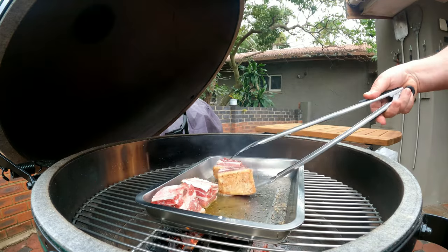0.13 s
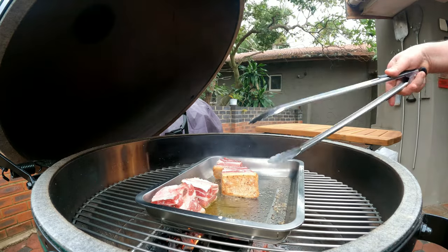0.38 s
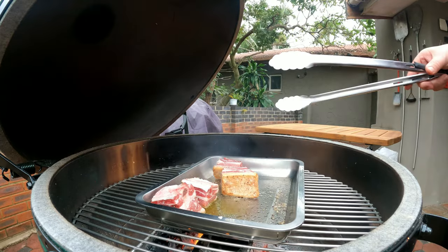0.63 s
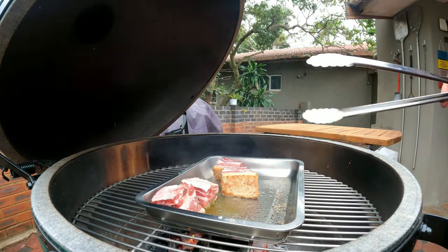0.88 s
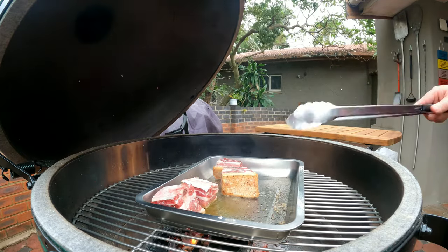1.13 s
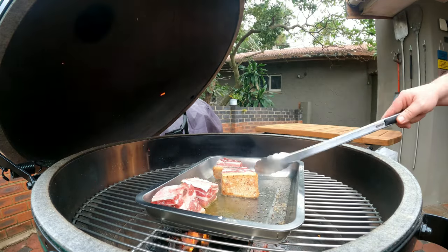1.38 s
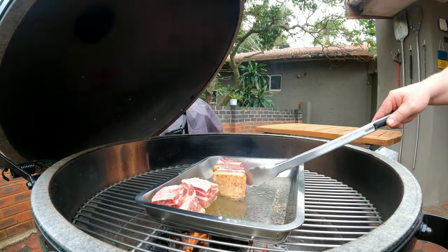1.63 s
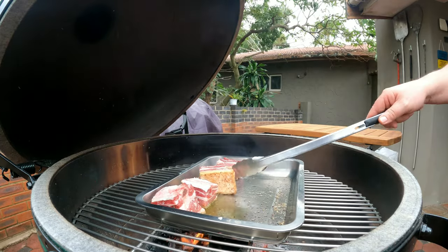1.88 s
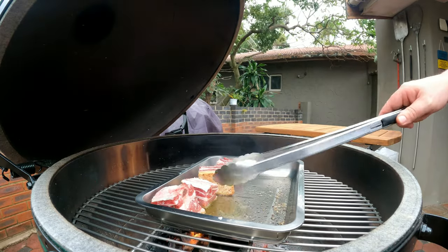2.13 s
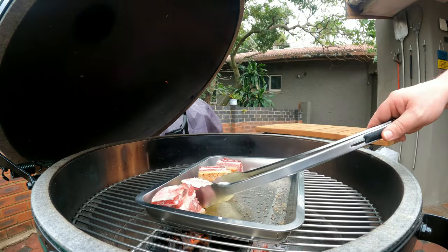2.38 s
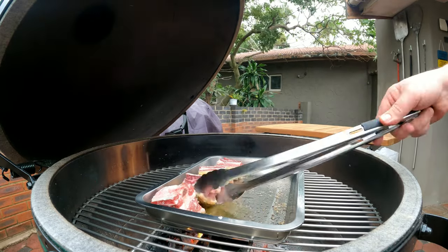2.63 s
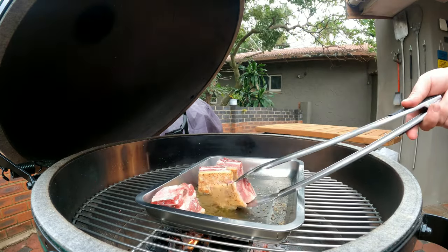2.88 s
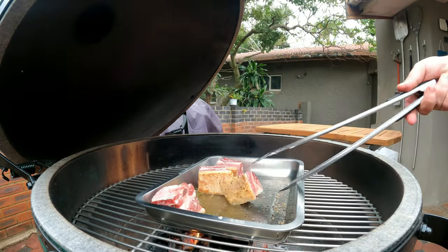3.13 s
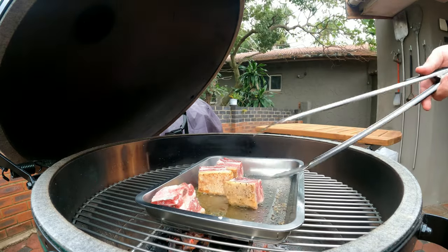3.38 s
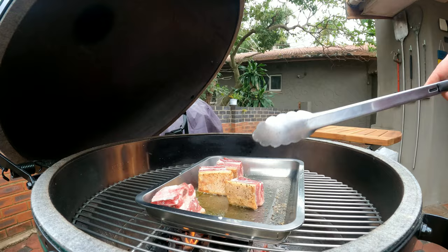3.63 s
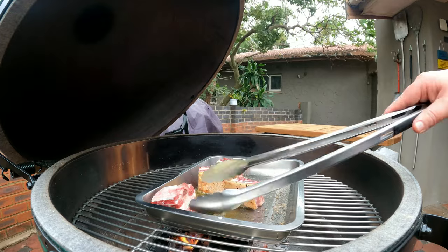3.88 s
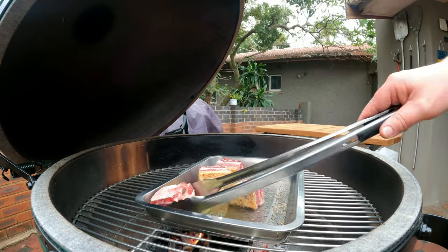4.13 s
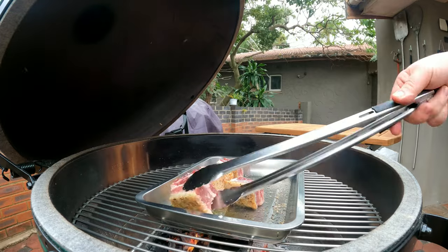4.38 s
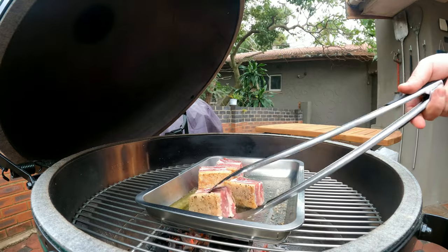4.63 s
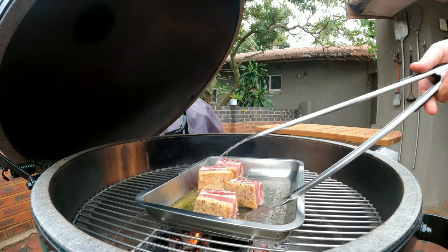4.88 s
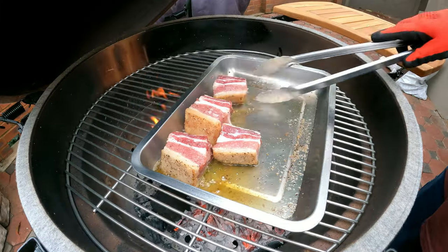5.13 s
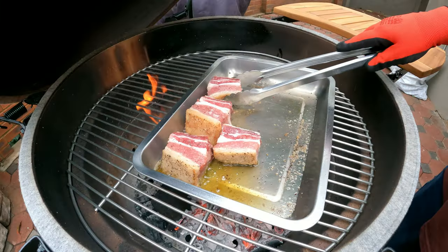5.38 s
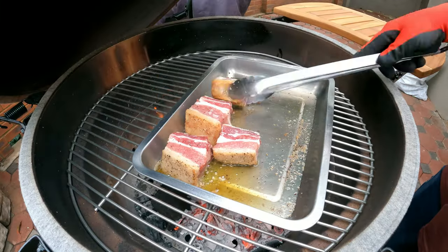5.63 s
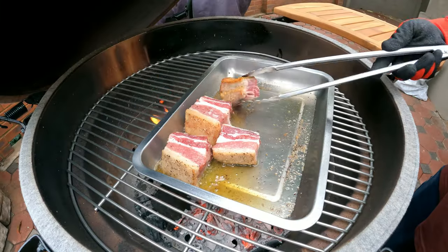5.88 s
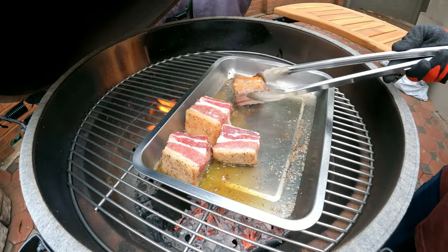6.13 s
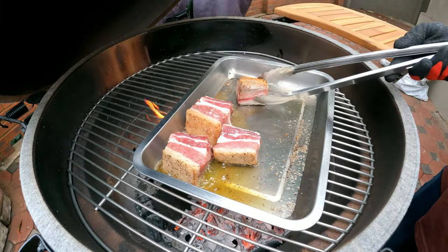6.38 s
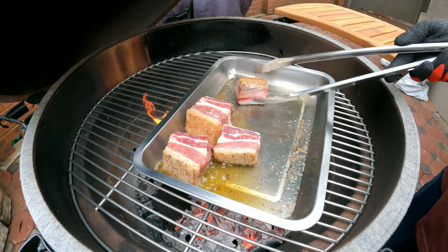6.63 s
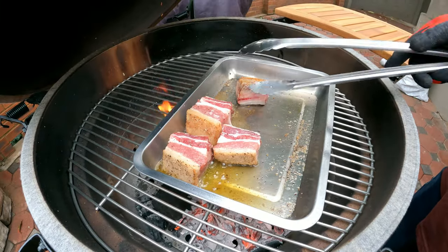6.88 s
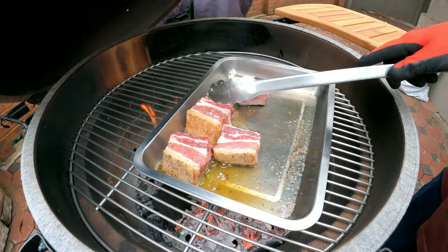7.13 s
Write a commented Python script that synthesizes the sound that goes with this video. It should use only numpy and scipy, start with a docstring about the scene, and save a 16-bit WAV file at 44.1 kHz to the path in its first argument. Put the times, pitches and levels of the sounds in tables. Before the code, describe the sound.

Steady bubbling sizzle and loud irregular fat pops from a steel tray, cut by a short silence before closer, hissier frying with wind buffeting.

```python
"""Meat sears in hot oil in a steel tray: bubbles burst as dense fizz and loud pops, each a short rising tone.
Pops add torn-film noise and tray thuds; droplets spit and tick, sputters swell, filtered noise hisses.
The charcoal kettle around it, domed lid open outdoors, echoes bubbles and droplets; coals snap drily.
Wind rumbles and thumps at the microphone; resonant noise makes whooshes and, last, likely a touch of tongs.
The microphone is beside the kettle; after an abrupt cut and short silence, above the tray, more buffeted."""
import sys
import numpy as np
from scipy import signal
from scipy.fft import rfft, irfft, next_fast_len
from scipy.io import wavfile
from scipy.ndimage import uniform_filter1d

SR = 44100
rng = np.random.default_rng(int(sys.argv[2]) if len(sys.argv) > 2 else 0)


def how_loud(loudness_db):
    """Turn decibels into a plain amplitude multiplier (0 dB gives 1, 20 dB gives 10)."""
    steps = np.asarray(loudness_db, float) / 20
    return 10 ** steps


def generate_wav(signal):
    """Clip the signal to [-1, 1] and save it as 16-bit WAV at the path in sys.argv[1]."""
    frames = np.transpose(np.atleast_2d(signal))
    scaled = np.clip(frames, -1, 1) * 32767
    pcm = np.round(scaled).astype(np.int16)
    wavfile.write(sys.argv[1], SR, pcm)


N = 320166

# channel-difference noise: [f/Hz, level re octave/dB]
GRAIN_SPECTRUM = [(60, -16), (150, -44), (380, -17), (950, -26), (2380, -32.5), (5980, -21.5),
                  (15000, -8.5)]
# wind colour: [f/Hz, relative density/dB per Hz]
WIND_SPECTRUM = [(12, -50), (20, -20), (59, 1), (108, 4.5), (197, -2.5), (362, -23.5), (500, -27.5),
                 (650, -59), (1100, -120)]
# gusts: [t/s, length/s, level before band filter/dB]
GUSTS = [(.3, 0.34, -56), (.87, 0.34, -52), (1.65, 0.54, -56.5), (3.2, 0.28, -62), (4.14, 0.047, -52),
         (5.52, 0.062, -39), (5.68, 0.07, -32.5), (5.82, 0.066, -37), (6.02, 0.17, -35),
         (6.38, 0.13, -34.5), (6.57, 0.016, -44.5), (6.64, 0.064, -45.5), (6.78, 0.017, -47.5),
         (6.91, 0.046, -45.5), (7.06, 0.026, -43), (7.24, 0.022, -41)]
# low wind thumps: [nominal t/s, level before band filter/dB, starting f/Hz]
THUMPS = [(5.564, -33, 143), (5.664, -24, 127), (5.699, -21, 82.5), (5.739, -20.5, 125), (5.798, -25, 106),
          (6.023, -20.5, 94), (6.067, -14.5, 184), (6.125, -15.5, 155), (6.15, -25, 156),
          (6.303, -28.5, 111), (6.376, -22, 106), (6.411, -27, 133.6), (6.485, -19, 92.5),
          (6.626, -32, 107), (6.928, -33, 76.7), (7.057, -33, 114), (7.143, -26, 190), (7.183, -29.5, 105)]
# hollow noises: wind whooshes, and at 7.22 s likely a touch of the tongs: [t/s, length/s, level/dB, f/Hz]
HOLLOW_NOISES = [(6.116, 0.034, -54, 724), (6.23, 0.28, -52.5, 733), (6.29, 0.11, -55, 561),
                 (7.22, 0.03, -49.5, 595)]
# hiss and air beside the kettle: [f/Hz, relative density/dB per Hz]
HISS_BESIDE = [(29, -40.5), (50, -28), (129, 2.5), (185, -4), (280, -3), (539, -4), (1390, -7.5),
               (2050, -4), (2490, -9), (4140, -10.5), (5400, -16.5), (7060, -14), (15000, -28),
               (16500, -44.5)]
# hiss and air above the tray: [f/Hz, relative density/dB per Hz]
HISS_ABOVE = [(180, -27), (300, 1.5), (373, -6), (558, 0), (1250, -5), (1960, 1), (3970, 2.5),
              (8580, -11.5), (14700, -21.5), (15700, -22), (16500, -50)]
# lid echoes: [nominal delay/s, level before bowl filter/dB]
LID_ECHOES = [(.0042, -7), (.008, -17), (0.0105, -18)]
# charcoal snaps: [t/s, level before band filter/dB]
SNAPS = [(1.5731, -9.5), (2.1359, -6.5), (5.7453, -8)]
# tray knocks: [t/s, level before band filter/dB, starting f/Hz]
KNOCKS = [(1.364, -34, 805), (1.94, -19.5, 1000), (2.029, -32, 765), (2.22, -34, 607), (3.676, -29.5, 770),
          (3.79, -33, 805), (4.623, -30, 750), (3.034, -32, 170), (3.034, -17.5, 806), (3.356, -26.5, 704),
          (3.388, -32, 506), (5.25, -28.5, 630)]
# spitting droplets: [t/s, level before band filter/dB]
SPITS = [(.043, -33.5), (0.332, -40), (.463, -45), (.568, -41), (.637, -36), (1.352, -37), (1.711, -33),
         (1.738, -38), (1.955, -34.5), (2.128, -39), (2.2206, -17), (2.245, -35), (2.434, -35),
         (2.894, -38), (3.102, -33), (3.123, -32), (3.75, -31), (3.894, -35), (4.305, -37), (4.727, -36),
         (5.229, -34), (5.718, -35), (6.926, -34)]
# passband of those droplets: [low f/Hz, high f/Hz]
SPIT_BAND_HZ = [6000, 14000]
# passbands of random droplet ticks: [low f/Hz, high f/Hz]
TICK_BANDS_HZ = [(2000, 7000), (5000, 11000), (7000, 13500)]
# loud pops: [t/s, nominal level/dB, starting bubble f/Hz, nominal spit level re pop/dB]
POPS = [(0.068, -17, 1800, -33), (.094, -22, 4030, -35), (.104, -21, 4100, -30), (.121, -25, 4050, -21),
        (0.196, -16, 4100, -16.5), (0.257, -25, 4000, -28), (0.477, -15.5, 1970, -18),
        (.507, -18, 4100, -25), (0.547, -18.5, 1950, -20), (0.592, -16, 2270, -16),
        (0.6556, -14, 1800, -25), (0.6837, -22, 2500, -1.5), (0.777, -20, 1710, -22),
        (0.817, -21.5, 2450, -7), (0.832, -12.5, 1800, -41), (.849, -18, 3650, -24),
        (0.944, -18, 3550, -20.5), (.96, -18, 1900, -23), (.986, -19, 1930, -18), (1.103, -18, 4540, -22),
        (1.115, -14, 2210, -24), (1.13, -9, 2040, -24), (1.158, -18, 2480, -30), (1.3042, -14.5, 4150, -22),
        (1.314, -19, 2100, -16), (1.3645, -13, 2600, -12), (1.476, -20.5, 2690, -6),
        (1.631, -19.5, 2480, -36), (1.7622, -15.5, 2400, -27), (1.8686, -27, 2470, -2.5),
        (1.883, -17.5, 3720, -24), (1.927, -21, 1880, -14), (1.938, -10, 2740, -6), (1.97, -19, 2620, -26),
        (1.984, -20, 1710, -31), (2.028, -9.5, 3500, -14), (2.0497, -23, 3940, -22),
        (2.061, -20, 3800, -21), (2.207, -12.5, 1930, -47), (2.2197, -4, 3800, -11),
        (2.275, -29.5, 3160, 0), (2.295, -18.5, 4210, -11.5), (2.3252, -14, 1970, -22),
        (2.4952, -14, 3360, -20), (2.5513, -17, 1810, -20), (2.563, -18, 1960, -32),
        (2.689, -12, 1800, -63), (2.741, -13, 2590, -33), (2.817, -18, 2080, -20), (2.858, -27, 2740, -4),
        (3.01, -25, 2200, -36), (3.021, -18, 2300, -33), (3.034, -2.5, 3640, -15), (3.0348, -8, 2400, -12),
        (3.082, -13.5, 2010, -24.5), (3.2783, -24.5, 4420, -3.5), (3.3008, -18, 1850, -37),
        (3.3549, -4.5, 4100, -15), (3.3869, -8.5, 4730, -11), (3.4944, -13.5, 3540, -28),
        (3.585, -18.5, 1900, -24), (3.675, -20, 2350, -8.5), (3.714, -9, 2410, -25),
        (3.7248, -12.5, 2000, -16), (3.741, -12, 4000, -29), (3.758, -16, 4260, -16),
        (3.7906, -7, 2240, -20), (3.817, -18, 4400, -32), (3.858, -17, 3900, -24),
        (3.9407, -15.5, 2200, -23.5), (3.958, -17, 2200, -23), (3.9685, -20, 4440, -9),
        (4.2117, -28, 2280, -5), (4.4474, -11, 1920, -34.5), (4.467, -18, 1990, -43.5),
        (4.6229, -16, 3740, -10.5), (4.637, -16, 1930, -18), (4.71, -21, 4300, -19),
        (4.77, -18.5, 2300, -18), (4.873, -15.5, 2190, -30.5), (4.971, -6, 1800, -28),
        (5.096, -12.5, 3300, -8), (5.184, -8, 3850, -16.5), (5.197, -17, 3800, -24),
        (5.214, -11.5, 2240, -18), (5.2491, -13, 3760, -9), (5.609, -15.5, 3800, -23),
        (5.8852, -9, 3970, -31), (5.898, -12, 3920, -34), (5.9248, -25, 2600, -16.5),
        (6.0385, -15.5, 3830, -22), (6.09, -13.5, 3470, -23), (6.3667, -18.5, 2840, -17),
        (6.391, -18, 2190, -30), (6.6093, -11.5, 2340, -29), (6.6926, -18, 2550, -23),
        (6.7446, -7, 3300, -47), (6.7598, -16, 3400, -35), (6.7626, -13, 3140, -41),
        (6.9533, -10, 3260, -48), (7.1873, -22, 3700, -24), (7.21, -14, 2540, -32)]
# small bubbles by pitch: [f/Hz, relative level beside/dB, relative level above/dB]
FIZZ_LEVELS = [(710, -16.5, -16.5), (1370, -27, -23), (1800, 0, 1), (2480, -7.5, 4.5), (3690, 0.5, 8.5),
               (4100, -13.5, 1), (5240, -10, 3), (8500, -19, -2.5), (13100, -26.5, -17.5)]
# sputters: [t/s, length/s, level over frying/dB, centre f/Hz]
SPUTTERS = [(0, 0.36, 2, 4060), (0.47, 0.19, 3, 1940), (0.937, 0.05, 6.5, 3980), (0.948, 0.041, 5.5, 1850),
            (1.098, 0.025, 7, 2650), (1.932, 0.033, 9, 2600), (2.23, 0.097, 5, 2600),
            (3.003, 0.046, 7, 2180), (3.716, 0.037, 6.5, 2300), (3.7, 0.33, 3, 4400),
            (3.81, 0.074, 3.5, 2200), (4.402, 0.055, 5, 1890), (4.604, 0.059, 2.5, 4060),
            (4.633, 0.7, 3.5, 6240), (5.174, 0.15, 4, 3620), (5.76, 0.031, 10.5, 2260),
            (6.075, 0.031, 9, 5000), (6.918, 0.14, 5, 5000)]
# frying: [t/s, vigour level/dB, brightness/dB]
FRYING = [(0, -44.5, 1), (.8, -43.5, 0.5), (1.3, -43.5, 0.5), (2.3, -44.5, 1), (2.9, -43.5, 0),
          (4.1, -43, -1), (4.6, -42.5, -0.5), (4.9, -42, -1), (5.25, -41.5, 0), (5.6, -41.5, 1.5),
          (5.95, -39.5, 4.5), (6.6, -39.5, 0.5), (7.0, -39.5, 3), (7.26, -37.5, 3.5)]

MOVE_S = 5.4
ECHO_ABOVE_DB = -6.5  # echoes are weaker above the tray


def rms_one(x):
    """Scale to rms 1."""
    return x / np.sqrt(np.mean(x ** 2) + 1e-20)


def in_time(rows):
    """Columns of a curve, sample by sample."""
    t_s, *columns = np.transpose(rows)
    return [np.interp(np.arange(N) / SR, t_s, column) for column in columns]


def at_hz(points, hz, column=1):
    """A spectrum column read on a log-frequency axis."""
    points = np.array(points)
    return np.interp(np.log(hz), np.log(points[:, 0]), points[:, column])


def by_place(beside, above):
    """One value before the microphone moves, another after."""
    return np.where(np.arange(N) < MOVE_S * SR, beside, above)


def filtered(x, hz, kind, order=2):
    """Butterworth filter."""
    return signal.sosfilt(signal.butter(order, hz, kind, fs=SR, output="sos"), x)


def drift(rate_hz):
    """Slow random curve of about unit rms: noise through two equal poles at rate_hz."""
    pole = np.exp(-80 * np.pi * rate_hz / SR)  # runs at SR / 40
    noise = rng.standard_normal(N // 40 + 2002)
    slow = signal.lfilter([1], [1, -2 * pole, pole * pole], noise)[2000:]
    return np.interp(np.arange(N) / 40, np.arange(len(slow)), rms_one(slow))


def coloured(spectrum):
    """Noise of a given spectrum, rms 1."""
    size = next_fast_len(N)
    hz = np.maximum(np.arange(size // 2 + 1) * SR / size, 1)
    shaped = rfft(rng.standard_normal(size)) * how_loud(at_hz(spectrum, hz))
    return rms_one(irfft(shaped, size)[:N])


def swells(rows, rise_db_per_s, fall_db_per_s, floor_db):
    """Level in dB: each row rises, holds and falls; the loudest counts."""
    t = np.arange(N) / SR
    for start_s, length_s, db in rows:
        rise = rise_db_per_s * np.maximum(start_s - t, 0)
        fall = fall_db_per_s * np.maximum(t - start_s - length_s, 0)
        floor_db = np.maximum(floor_db, db - rise - fall)
    return floor_db


def add(out, t_s, wave):
    """Mix a wave in at a time."""
    i = max(round(t_s * SR), 0)
    out[i:i + len(wave)] += wave[:N - i]


def bubble(hz, cycles, rise):
    """A few cycles that swell, die and climb in pitch; envelope peak 1."""
    turns = np.arange(int(4 * cycles * SR / hz)) * hz / SR
    swell = turns / cycles * 2
    return swell * np.exp(1 - swell) * np.sin(2 * np.pi * turns * (1 + rise * turns))


def kettle(wave, echo_db=0, shift=0.055):
    """Lid echoes, randomly shifted per call for place on the tray, and a dense decaying bowl tail."""
    t60_s, bowl_db, bowl_cut_hz = 0.059, -3, 4400
    t = np.arange(int(.09 * SR)) / SR
    tail = rng.standard_normal(len(t)) * how_loud(-60 * t / t60_s) * np.minimum(t / 0.00033, 1)
    response = how_loud(bowl_db) * tail / np.sqrt(np.sum(tail ** 2))
    for (delay_s, db), place in zip(LID_ECHOES, rng.standard_normal(len(LID_ECHOES))):
        response[round(delay_s * SR * (1 + shift * place))] += how_loud(db)
    response = how_loud(echo_db) * filtered(response, bowl_cut_hz, "low", order=1)
    response[0] = 1  # direct sound
    return signal.fftconvolve(np.atleast_2d(wave), response[None], axes=1)


def edit_gain():
    """Abrupt cut with a faint fast-falling trail, silence, short fade-in."""
    out_s, in_s, fade_s, fade_power = 5.284, 5.5, 0.065, 1.7
    trail_db, trail_fall_db_per_s = -37, 1500
    t = np.arange(N) / SR
    trail = how_loud(trail_db - trail_fall_db_per_s * np.maximum(t - out_s, 0))
    fade_in = np.clip((t - in_s) / fade_s, 0, 1) ** fade_power
    return np.where(t < out_s, 1, trail + fade_in)


def grain(mono, patchy_db=5.0):
    """Patchy noise that follows the slow level of each octave of the sound."""
    out, shared = np.zeros(N), drift(26.0)
    for low_hz in 31.25 * 2.0 ** np.arange(9):
        band = [low_hz, 2 * low_hz]
        power_db = 10 * np.log10(filtered(mono, band, "band") ** 2 + 1e-14)
        level = how_loud(uniform_filter1d(power_db, size=3000))
        noise = rms_one(filtered(rng.standard_normal(N), band, "band"))
        patches = rms_one(how_loud(patchy_db * (0.62 * shared + 0.7 * drift(12))))
        out += how_loud(at_hz(GRAIN_SPECTRUM, low_hz * np.sqrt(2))) * level * noise * patches
    return out


def wind(lumpy_db=3.0):
    """Eddies press on the microphone: lumpy rumble, deeper in the kettle's lee, and single low thumps."""
    calm_db = by_place(-63, -52)
    rumble = coloured(WIND_SPECTRUM) * how_loud(lumpy_db * drift(13))
    deep = signal.lfilter([1], [1, -.997], rumble)
    level_db = swells(GUSTS, rise_db_per_s=146, fall_db_per_s=165, floor_db=calm_db)
    out = how_loud(level_db) * by_place(rms_one(deep), rms_one(rumble))
    for t_s, db, hz in THUMPS:
        add(out, t_s + 0.004, -how_loud(db) * bubble(hz, 0.54, 0.0086))
    return filtered(out, [42, 380], "band")


def hollow_noises(half_width=0.07):
    """Noise in one resonance for each hollow noise; half_width is a share of its pitch."""
    out = np.zeros(N)
    for *row, hz in HOLLOW_NOISES:
        level_db = swells([row], rise_db_per_s=400, fall_db_per_s=160, floor_db=-100)
        band = [hz * (1 - half_width), hz * (1 + half_width)]
        out += how_loud(level_db) * rms_one(filtered(rng.standard_normal(N), band, "band"))
    return out


def hiss(hiss_db, flicker_db=(2.5, 1.2)):
    """Countless tiny bursts and the open air blur to noise, levelled by its 1.5-9 kHz band."""
    noise = by_place(coloured(HISS_BESIDE), coloured(HISS_ABOVE))
    treble = filtered(noise, [1500, 9000], "band")
    move = int(MOVE_S * SR)
    noise = noise / by_place(treble[:move].std(), treble[move:].std())
    return noise * how_loud(hiss_db + by_place(*flicker_db) * drift(19.7))


def snaps():
    """A crack in the coal is one short dry pulse that swings back slowly."""
    out = np.zeros(N)
    for t_s, db in SNAPS:
        add(out, t_s, how_loud(db) * np.exp(-np.arange(60) / 1.4))
    return filtered(out, [300, 12000], "band")


def knocks(cycles=0.66):
    """The tray flexes for a cycle or two: dull tones with kettle echoes."""
    out = np.zeros(N)
    for t_s, db, hz in KNOCKS:
        add(out, t_s, how_loud(db) * kettle(bubble(hz, cycles, 0.14))[0])
    return filtered(out, [120, 1100], "band")


def spits(length_s=0.00061):
    """Each droplet is a short burst of treble noise, high and thin."""
    out, t = np.zeros(N), np.arange(200) / SR
    envelope = t / length_s * np.exp(1 - t / length_s)
    for t_s, db in SPITS:
        add(out, t_s, kettle(how_loud(db) * envelope * rng.standard_normal(200))[0])
    return filtered(out, SPIT_BAND_HZ, "band")


def tearing(x):
    """Colour of a tearing oil film: strong low treble, a brief tray ring, a small peak high up."""
    x = filtered(filtered(x, 1550, "high"), 1550, "high")
    out = 0.44 * filtered(x, 16600, "low") + 1.28 * filtered(x, 4880, "low")
    return out + 0.12 * filtered(x, [3000, 5000], "band") + 0.1 * filtered(x, [9500, 13000], "band")


def crackle(fizz_db, spread_db=10.5, length_s=0.00047, rate_per_s=400.0):
    """Droplets spit at random: short ticks, each in one broad band, far more small than large."""
    sizes = how_loud(spread_db * np.minimum(rng.exponential(1, N), 2.2))
    born = rng.random(N) < rate_per_s / SR
    dealt, noise = rng.integers(0, 3, N), rng.standard_normal(N)
    decay = np.exp(-np.arange(200) / SR / length_s)
    ticks = np.zeros(N)
    for k, band in enumerate(TICK_BANDS_HZ):
        envelope = signal.oaconvolve(sizes * born * (dealt == k), decay)[:N]
        ticks += filtered(envelope * noise, band, "band")
    ticks = rms_one(tearing(kettle(ticks)[0, :N]))
    duller = filtered(ticks, 7200, "low")
    return how_loud(fizz_db + by_place(-10.0, -3.0)) * by_place(ticks, duller)


def pops(spit_s=0.0015, spit_gain_db=1.0, bubble_db=-10.0):
    """Each pop is a bubble, a spit of broad noise as the film tears, and a dull thud on the tray."""
    thud_db, thud_follows = -21, 1  # thud grows with the spit by this share
    layers = np.zeros((N, 3))
    t = np.arange(400) / SR
    burst = (t / spit_s * np.exp(1 - t / spit_s)) ** 2
    for t_s, db, hz, spit_db in POPS:
        bursts = rng.standard_normal((2, 400))
        bursts[:, 40] = [11.0, 9.0]  # the film gives way with one sharp crack
        burst_db = np.array([[spit_db + spit_gain_db], [thud_db + thud_follows * spit_db]])
        bursts *= burst * how_loud(db + burst_db)
        cycles = np.interp(spit_db, [-24, -12], [2.2, 1.4])  # a violent burst rings only briefly
        ring = how_loud(db + bubble_db) * bubble(hz, cycles, 0.0067)[:400]
        parts = np.vstack([np.pad(ring, (0, 400 - len(ring))), bursts])
        add(layers, t_s, kettle(parts, ECHO_ABOVE_DB * (t_s > MOVE_S)).T)
    bubbles, film, thuds = layers.T
    return bubbles + tearing(film) + 1.8 * filtered(thuds, [350, 950], "band")


def sputtering(frying, spread=1.3):
    """Water from the meat boils off in a rush of like bubbles: frying swells within a pitch ratio."""
    out = np.zeros(N)
    for t_s, length_s, db, hz in SPUTTERS:
        part = frying[max(round(t_s * SR), 0):round((t_s + length_s) * SR)]
        part = filtered(part, [hz / spread, hz * spread], "band")
        add(out, t_s, (how_loud(db) - 1) * signal.windows.tukey(len(part), .3) * part)
    return out


def fizz(fizz_db, spread_db=5.0, cycles=2.5, clump_db=4.0, echo_db=-6):
    """Small bubbles burst at random, in clumps, at 34 pitches, in six places on the tray."""
    sizes = how_loud(spread_db * np.minimum(rng.exponential(1, N), 2.5)) * rng.choice([-1, 1], N)
    rate_per_s = by_place(1800.0, 2600.0) * how_loud(clump_db * by_place(1, .7) * drift(20))
    born = rng.random(N) < rate_per_s / SR
    dealt = rng.integers(0, 34, N)
    places = np.zeros((6, N))
    for k, hz in enumerate(np.geomspace(700, 9000, 34)):
        gain = how_loud(by_place(at_hz(FIZZ_LEVELS, hz), at_hz(FIZZ_LEVELS, hz, column=2)))
        bursts = sizes * born * (dealt == k) * gain
        places[k % 6] += signal.oaconvolve(bursts, bubble(hz, cycles, 0.032))[:N]
    echoes = sum(kettle(x, echo_db)[0, :N] - x for x in places)
    out = places.sum(axis=0) + how_loud(by_place(0, ECHO_ABOVE_DB)) * echoes
    out += by_place(0.4, 0.31) * filtered(out, [3800, 4350], "band")  # the tray rings a little
    return how_loud(fizz_db) * rms_one(out)


def scene():
    """Sum all sources at one microphone, on both channels."""
    vigour_db, bright_db = in_time(FRYING)
    fizz_db = vigour_db + by_place(0.5, -6.5)
    hiss_db = vigour_db + by_place(-6.5, -6)
    frying = fizz(fizz_db) + crackle(fizz_db) + hiss(hiss_db)
    frying = frying + sputtering(frying)
    frying = frying + (how_loud(bright_db) - 1) * filtered(frying, 5000, "high")
    mono = frying + pops() + knocks() + snaps() + spits() + wind() + hollow_noises()
    return np.stack([mono, mono])


def band_limit(x):
    """A steep low-pass at the top of the band."""
    return signal.sosfilt(signal.butter(12, 17000, fs=SR, output="sos"), x)


def record(dry):
    """Add opposite-sign grain to the channels, cut the top, apply the cut and fade-in."""
    mix = dry + grain(dry[0]) * [[1], [-1]]
    top_cut = signal.cheby2(10, 24, 15900, fs=SR, output="sos")  # order, stopband dB, edge Hz
    mix = signal.sosfilt(top_cut, mix) * edit_gain()
    return band_limit(mix)


dry = scene()
out = record(dry)
generate_wav(out)
```